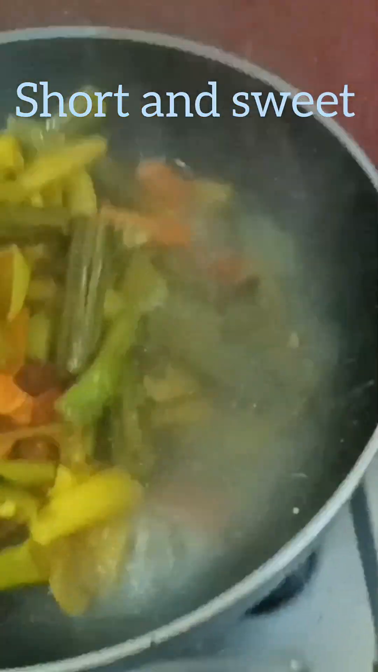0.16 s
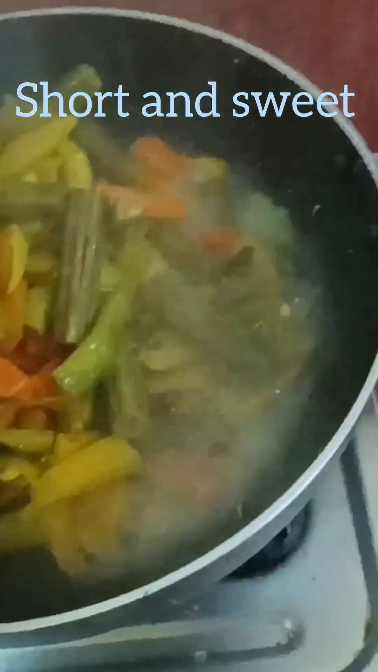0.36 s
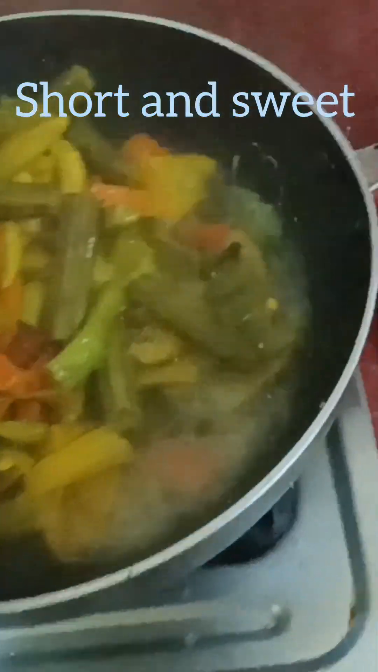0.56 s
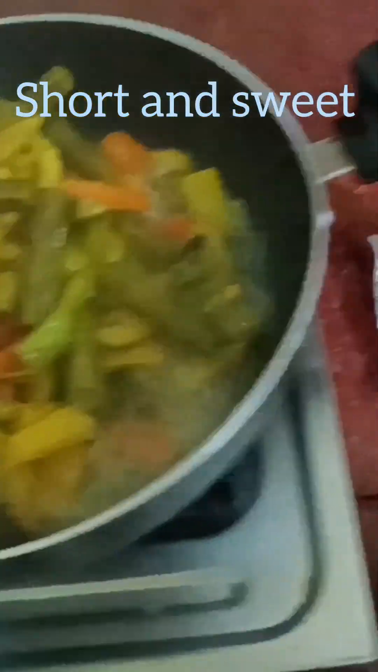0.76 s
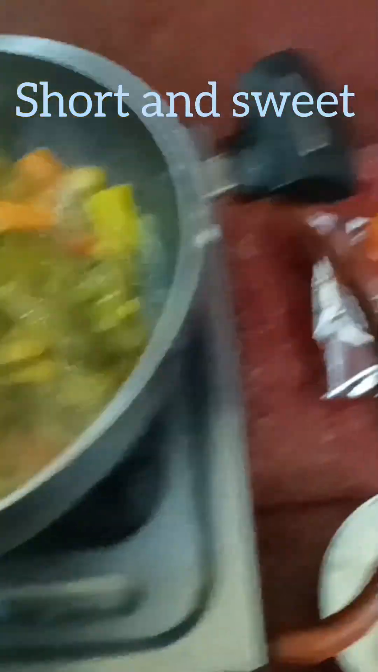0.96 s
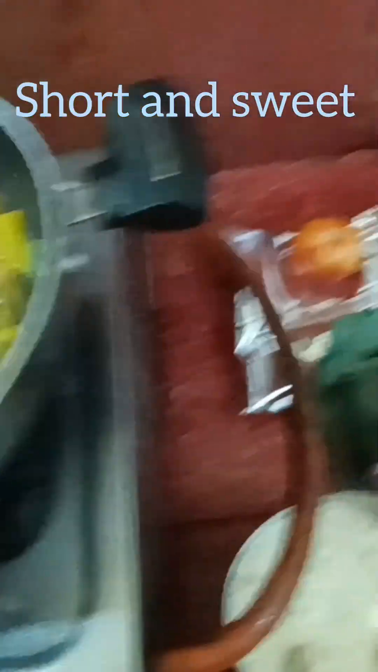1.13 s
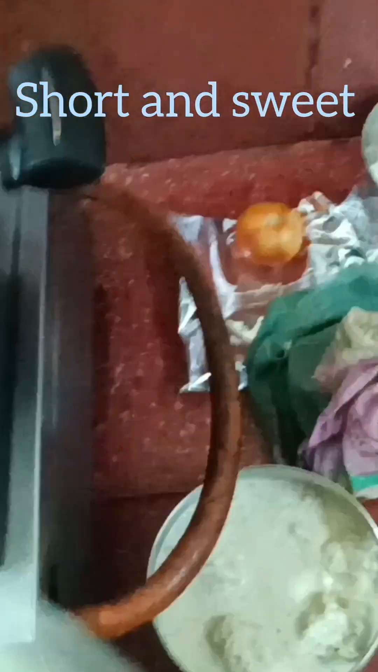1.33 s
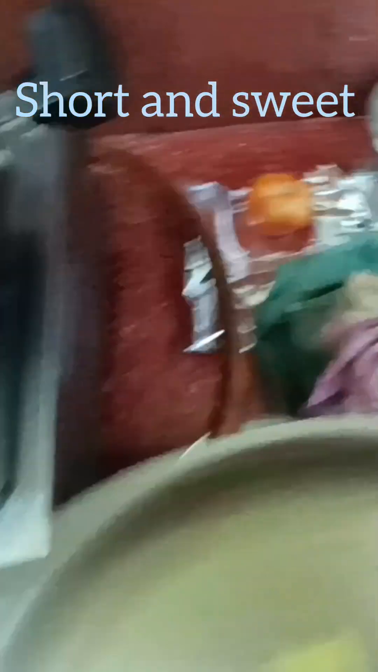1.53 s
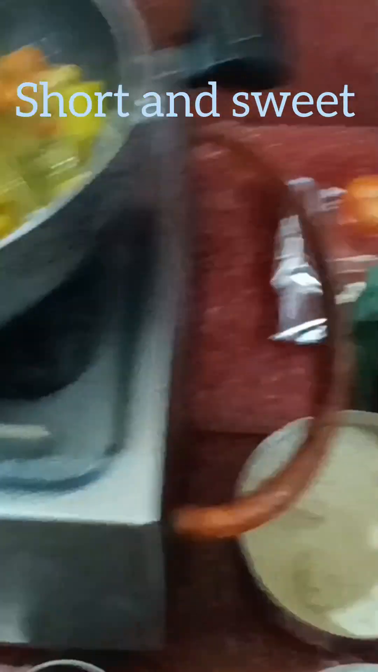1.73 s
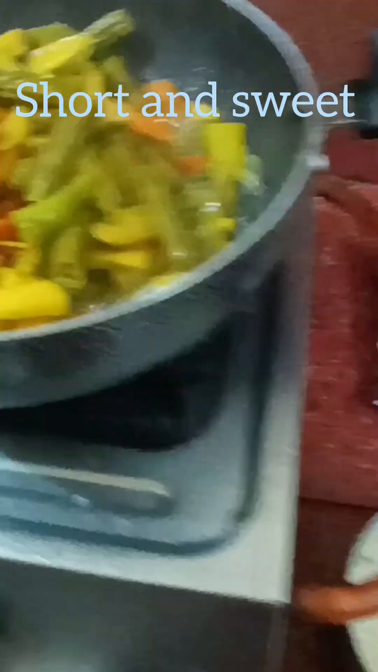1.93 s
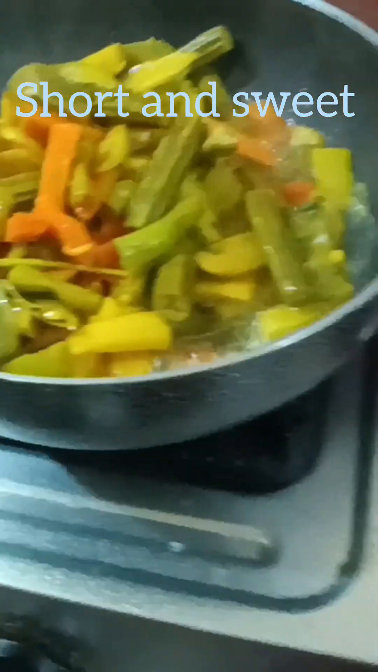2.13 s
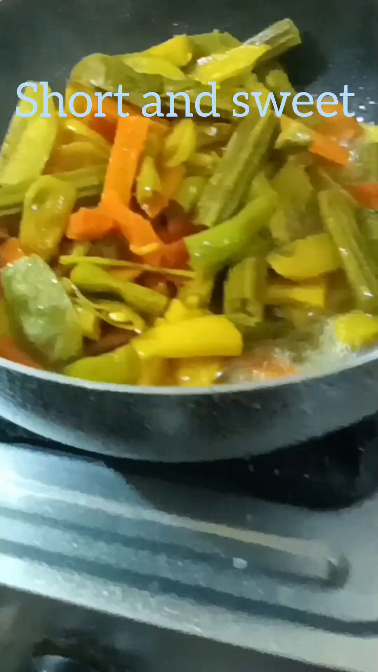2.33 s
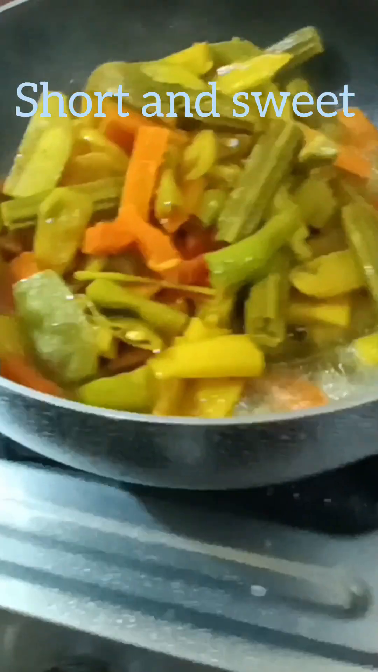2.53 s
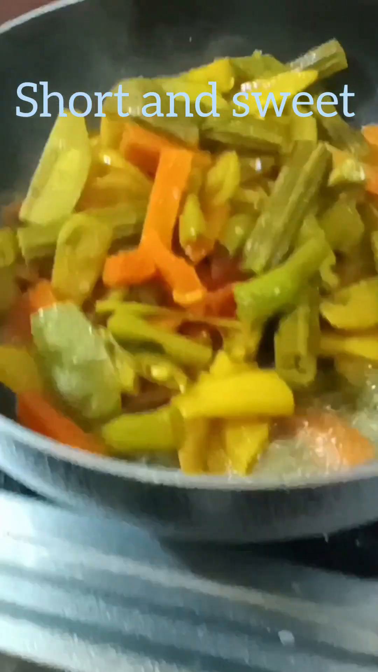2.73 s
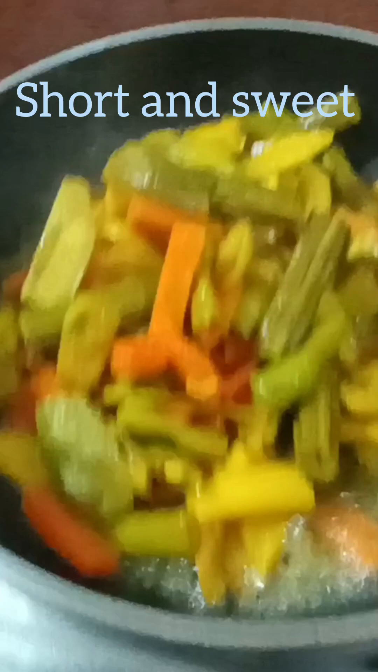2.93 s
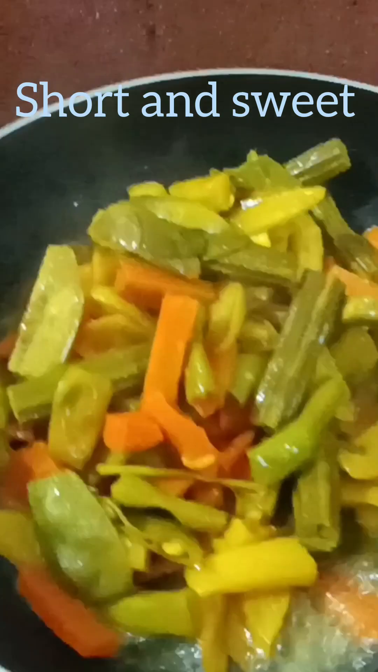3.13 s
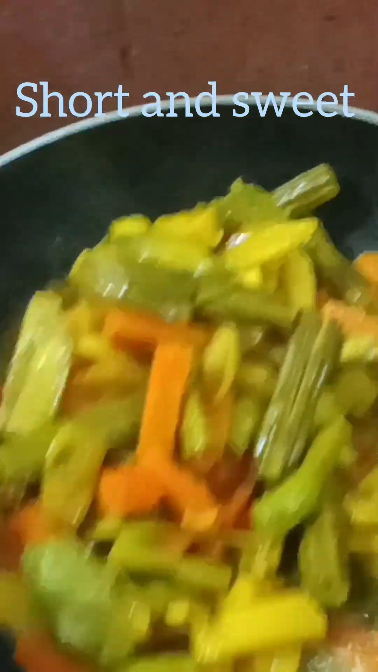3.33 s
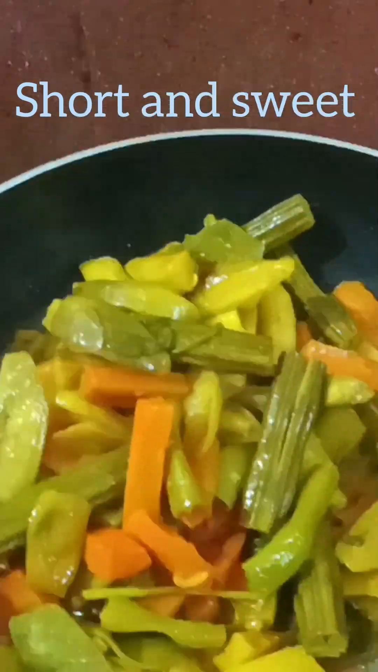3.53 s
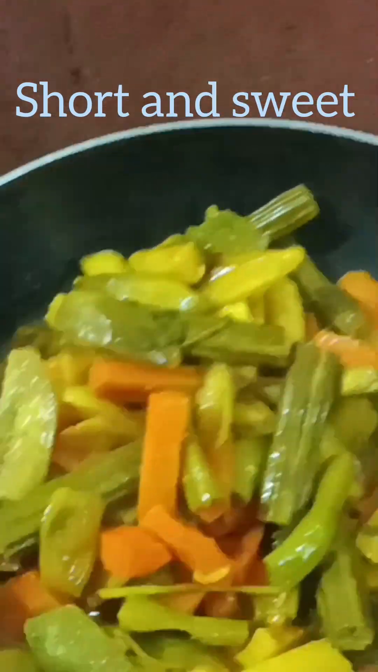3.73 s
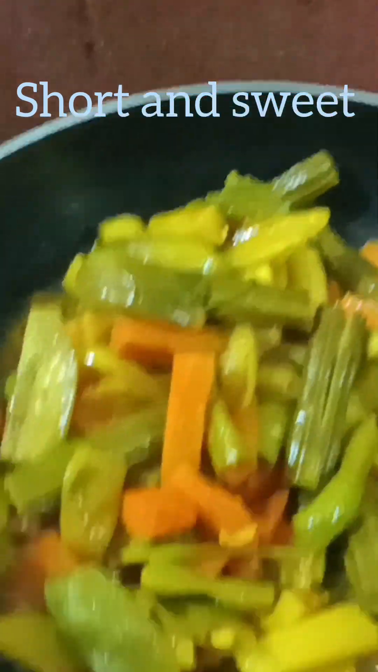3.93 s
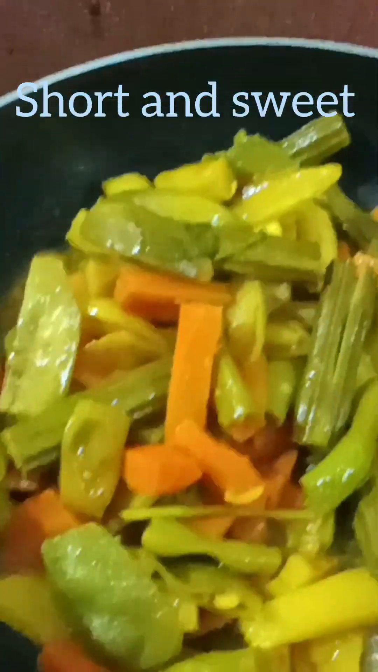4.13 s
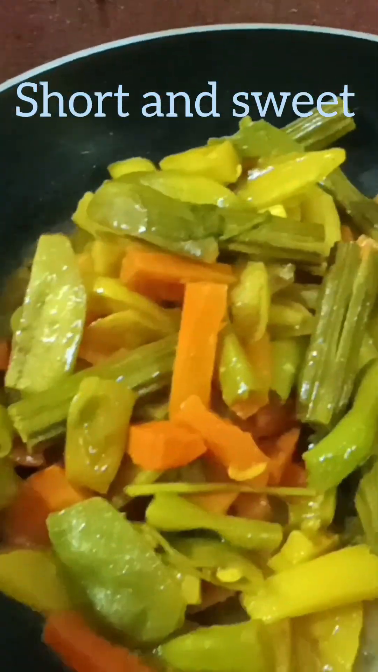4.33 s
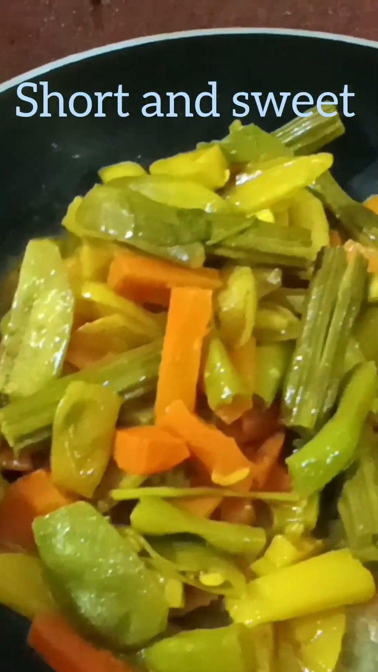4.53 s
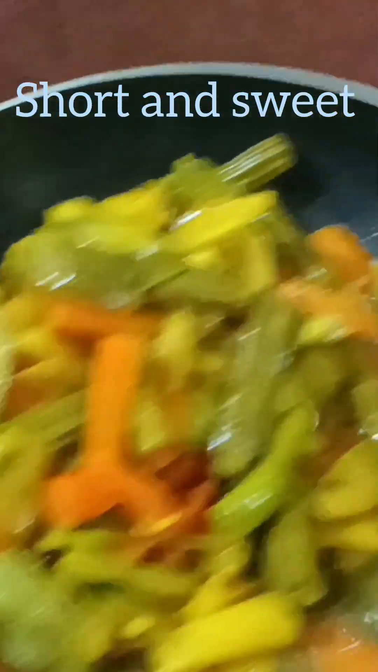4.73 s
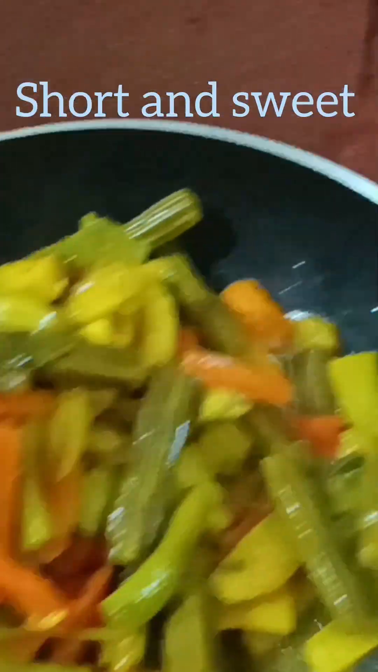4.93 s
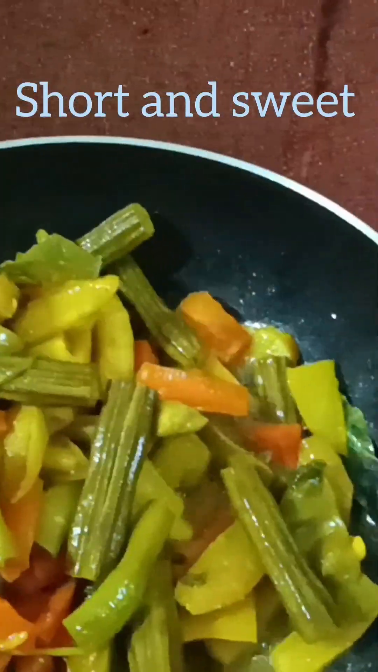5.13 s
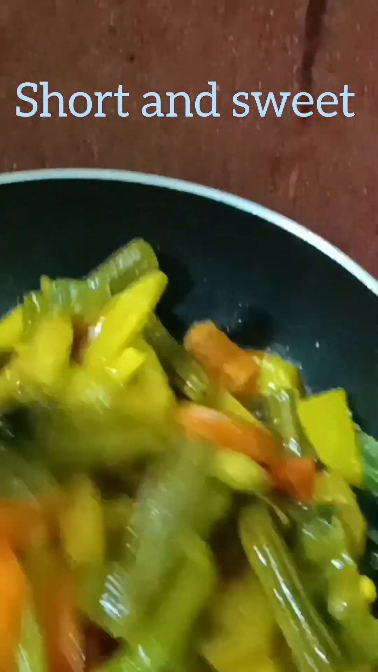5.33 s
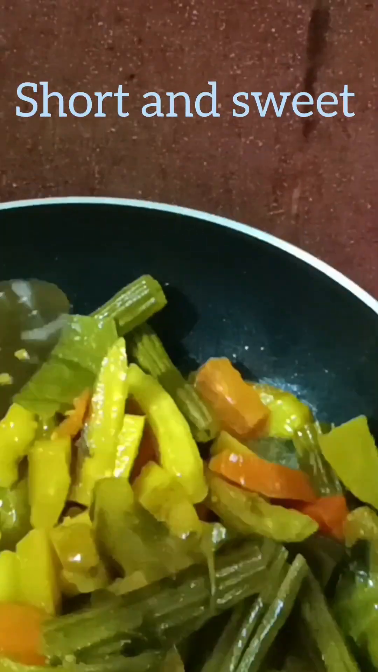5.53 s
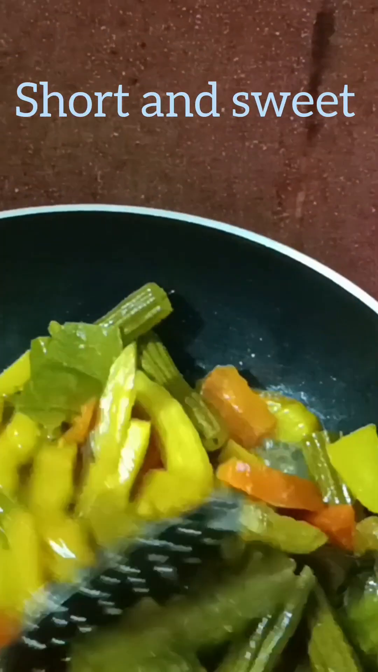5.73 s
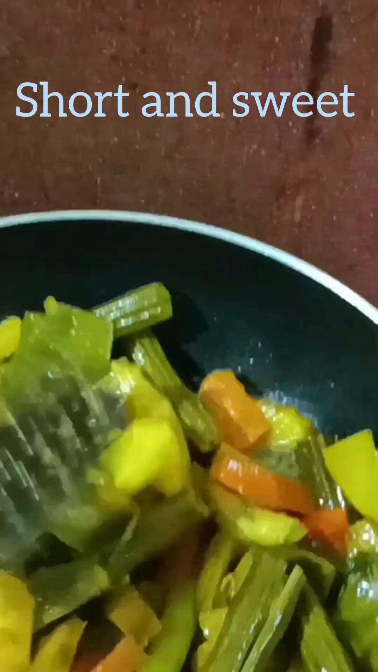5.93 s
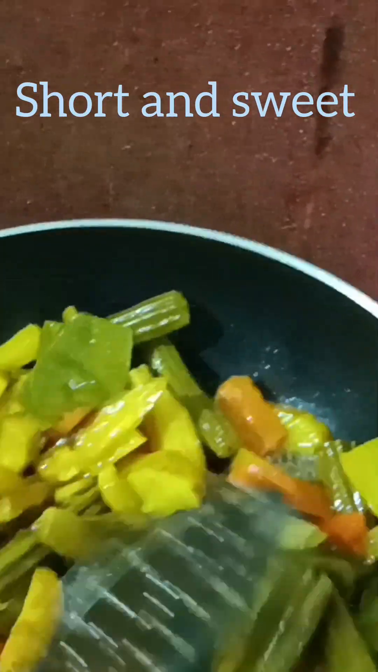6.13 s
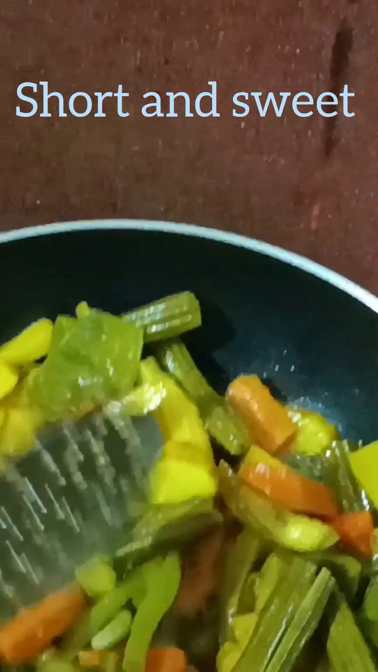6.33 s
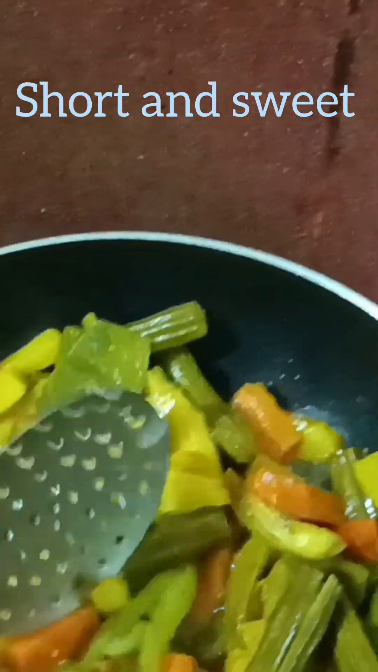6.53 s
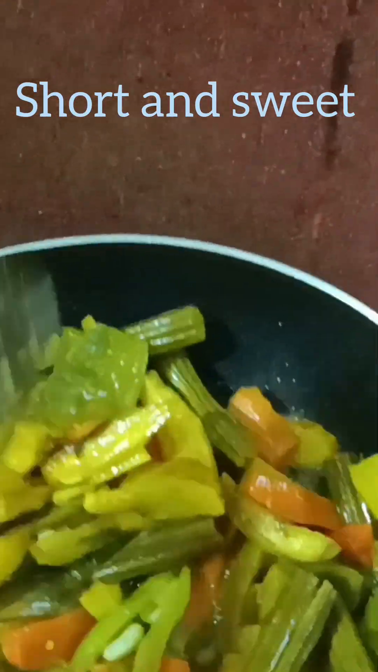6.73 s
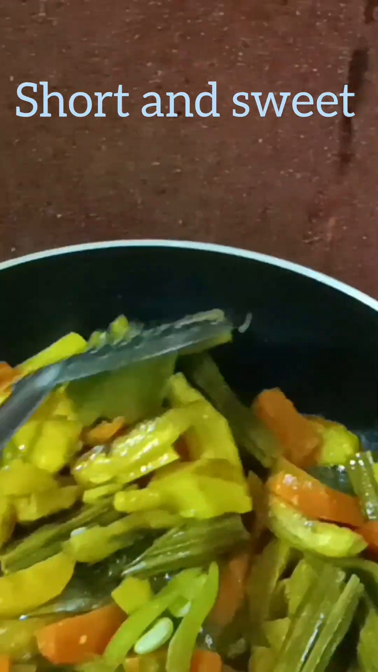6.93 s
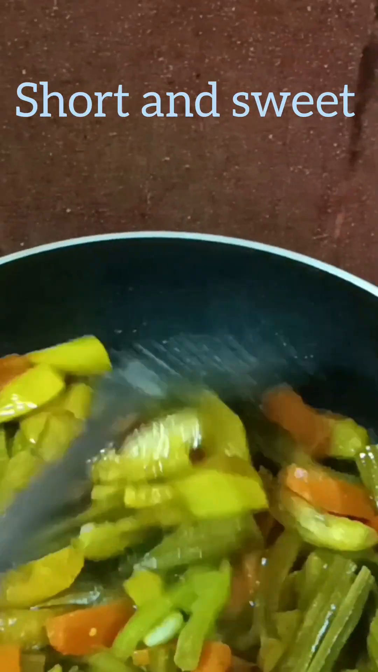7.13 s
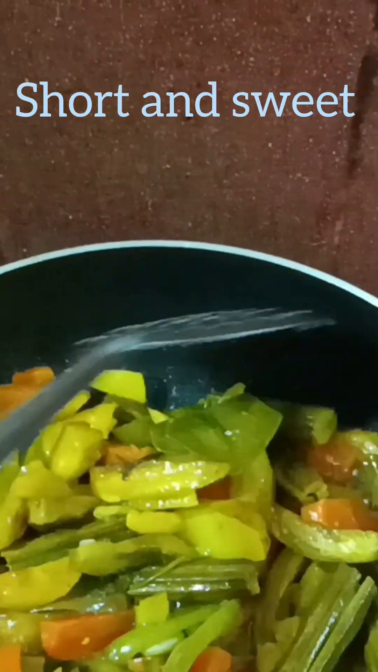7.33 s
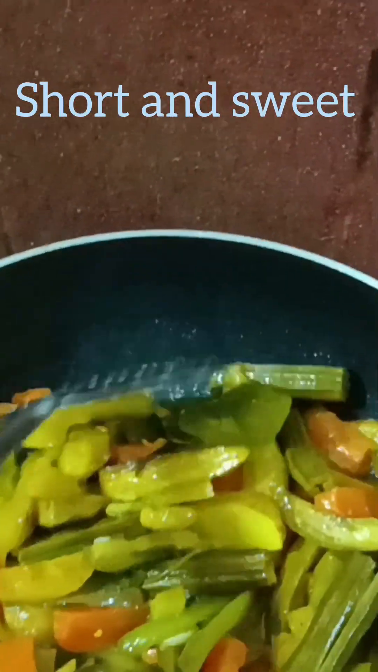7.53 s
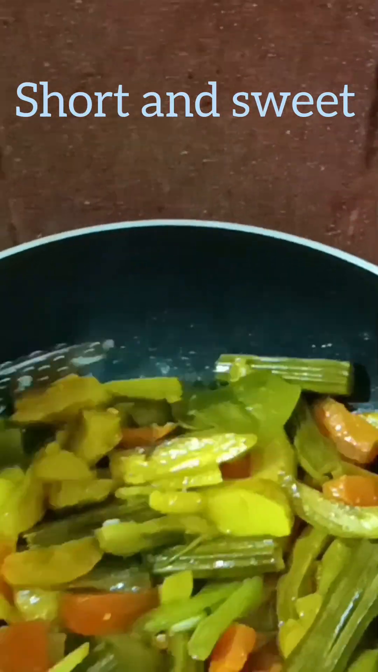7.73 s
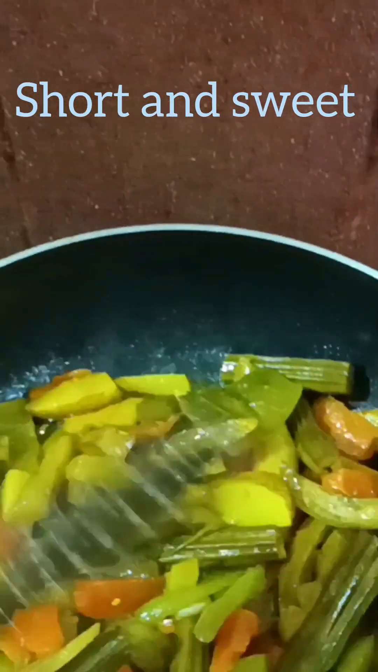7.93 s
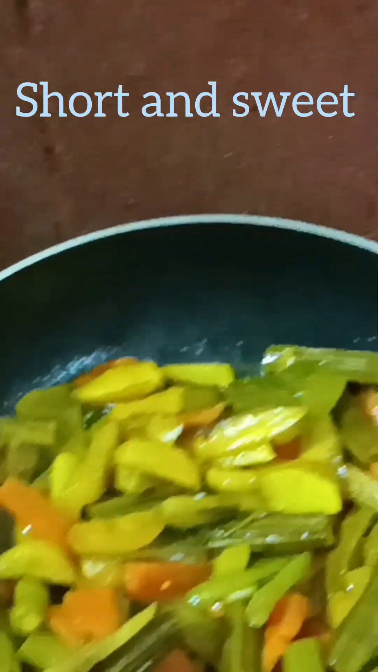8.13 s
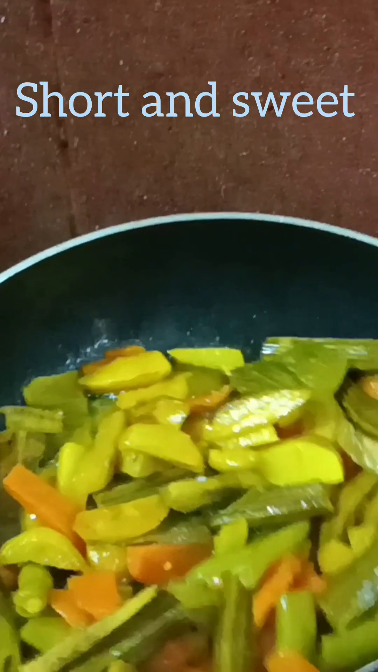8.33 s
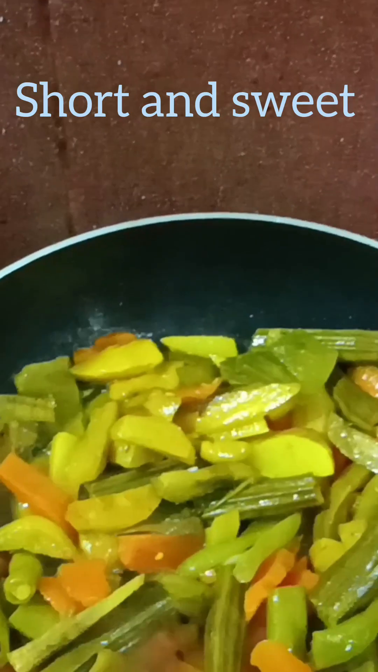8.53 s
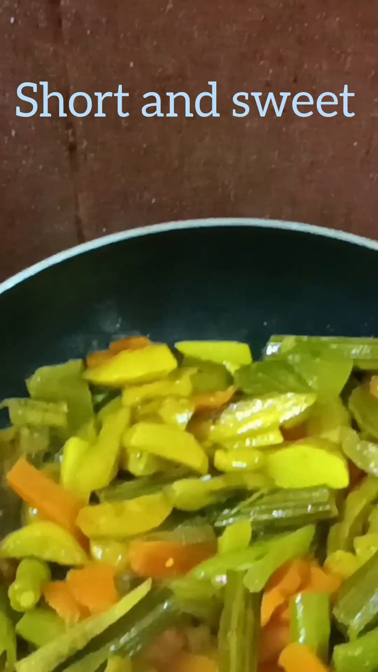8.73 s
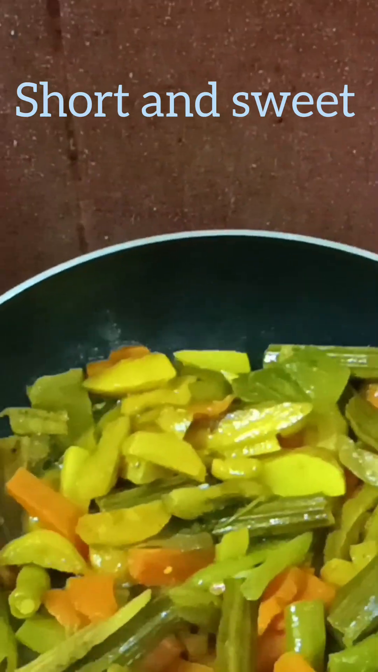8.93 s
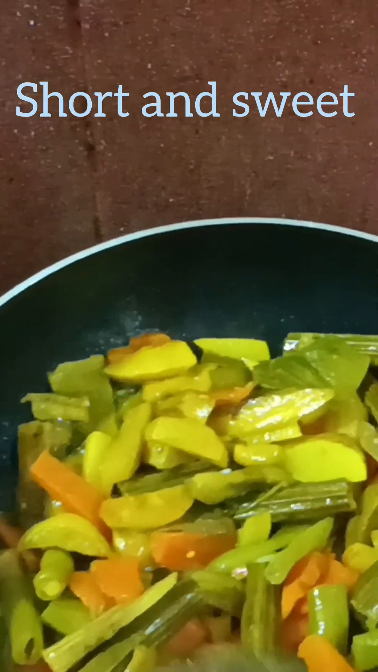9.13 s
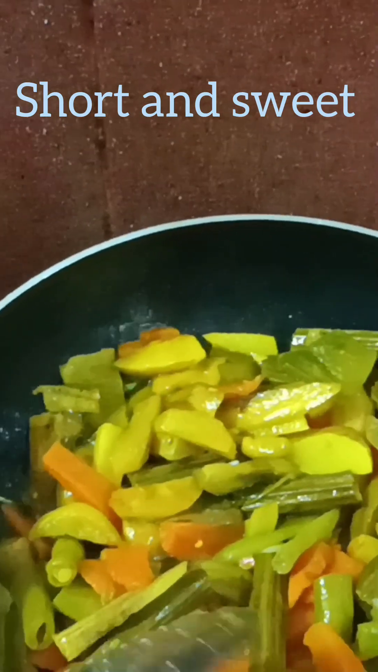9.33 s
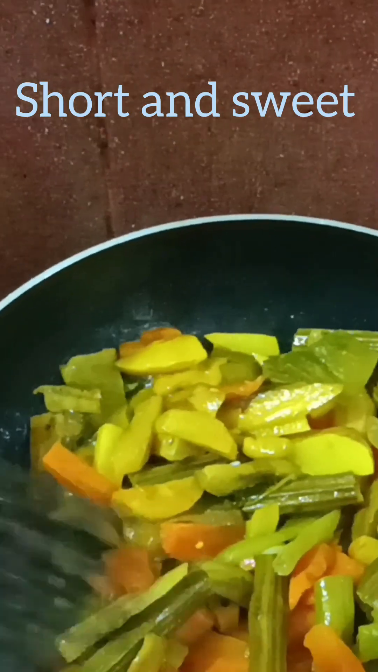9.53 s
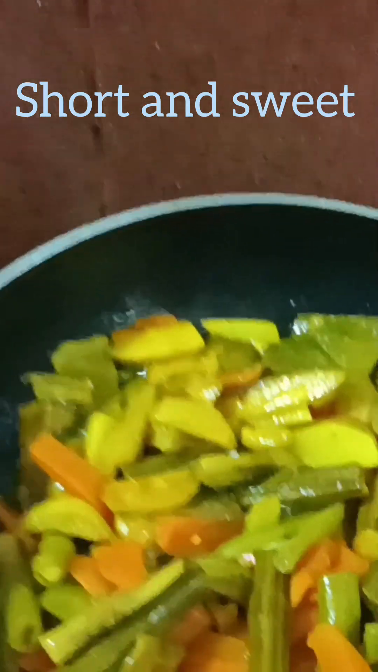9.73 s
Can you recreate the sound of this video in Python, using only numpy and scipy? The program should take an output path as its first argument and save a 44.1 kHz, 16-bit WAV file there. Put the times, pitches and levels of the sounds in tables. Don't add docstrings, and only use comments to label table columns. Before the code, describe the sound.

A handheld phone at arm's length catches a dense, bright sizzle, strongest at the start and steadily fading into separate crackles. An early hiss of steam vanishes after about a second. Light metal clinks, small steam squeaks and low scraping of the pan on its stove come next, then irregular sharp spoon ticks and soft thuds. The stereo is uneven, with bright details stronger on the left.

```python
import sys
import numpy as np
from scipy import signal
from scipy.fft import rfft, irfft, next_fast_len
from scipy.io import wavfile
from scipy.ndimage import uniform_filter1d

SR = 44100
rng = np.random.default_rng(int(sys.argv[2]) if len(sys.argv) > 2 else 0)


def wrap_up_sound(samples):
    columns = np.atleast_2d(samples).T
    tamed = np.clip(columns, -1, 1)
    steps = np.round(tamed * 32767).astype(np.int16)
    wavfile.write(sys.argv[1], SR, steps)


def ratio_of_db(decibels):
    return 10 ** (np.asarray(decibels, float) / 20)


N = 430857
PADDED = next_fast_len(N + 4096)
BINS_HZ = np.arange(PADDED // 2 + 1) * SR / PADDED
LEFT_LAG = 46


def rms_one(x):
    return x / np.sqrt(np.mean(x ** 2) + 1e-20)


def in_time(rows):
    times, *columns = np.transpose(rows)
    return [np.interp(np.arange(N) / SR, times, column) for column in columns]


def colour(x, gain):
    return irfft(rfft(x, PADDED) * gain, PADDED)[..., :N]


def response(points):
    hz, db = np.transpose(points)
    log_gain = np.interp(np.log(BINS_HZ + 1), np.log(hz), db) * np.log(10) / 20
    cepstrum = irfft(log_gain, PADDED)
    cepstrum[1:PADDED // 2] *= 2
    cepstrum[PADDED // 2 + 1:] = 0
    return np.exp(rfft(cepstrum))


def band_filter(x, order, edges_hz, kind):
    return signal.sosfilt(signal.butter(order, edges_hz, kind, fs=SR, output="sos"), x)


def drift(rate):
    r = np.exp(-40 * np.pi * rate / SR)
    slow = signal.lfilter([1], [1, -2 * r, r * r], rng.standard_normal(N // 20 + 3002))[3000:]
    return np.interp(np.arange(N) / 20, np.arange(len(slow)), rms_one(slow))


def ring(x, hz, t60):
    r, w = ratio_of_db(-60 / (t60 * SR)), 2 * np.pi * hz / SR
    return signal.lfilter([0, np.sin(w)], [1, -2 * r * np.cos(w), r * r], x + 1e-18)


def add(out, s, sound):
    i = round(s * SR)
    out[..., i:i + sound.shape[-1]] += sound[..., :N - i]


def bursts(per_s, spread_db, fall_s):
    sizes = ratio_of_db(spread_db * np.minimum(rng.exponential(1, N), 3.5))
    born = rng.random(N) < per_s / SR
    return rms_one(signal.lfilter([1], [1, -np.exp(-1 / (fall_s * SR))], sizes * born))


def whistles(per_s, low_hz, high_hz, cycles):
    sizes = ratio_of_db(3.5 * np.minimum(rng.exponential(1, N), 4)) * rng.choice([-1, 1], N)
    pops = sizes * (rng.random(N) < per_s / SR)
    dealt = rng.integers(0, 14, N)
    pitches_hz = np.geomspace(low_hz, high_hz, 14)
    rings = sum(ring(pops * (dealt == k), hz, cycles / hz) for k, hz in enumerate(pitches_hz))
    return pops, rings


# t/s, level/dB, aim of the phone (3 kHz hump's share of the fizz)/dB
FRYING = [(0, -20.5, -3), (.4, -20.5, -6), (.87, -22, -7), (1.36, -24, -2.5), (1.7, -24, -7),
          (2.1, -25.5, -3.5), (2.45, -26, -3), (2.9, -24.5, -2.5), (3.2, -24.5, -4.5), (3.7, -25, -5),
          (4.3, -26, -3), (5.1, -27, -7), (5.7, -26.5, -7), (6.8, -27.5, -7.5), (7.6, -29, -6.5),
          (8.4, -30, -5.0), (9.1, -30.5, -4.5), (9.77, -31.5, -4)]
# level re vigour/dB, share of vigour's swing [ratio], share of aim [ratio]
FIZZ_BANDS = [
    (-16, 1.16, 0.17),
    (-4.5, 0.95, 1.05),
    (-2.5, 1.06, -0.41),
    (-7, 1.61, -0.18),
]


def band_levels():
    vigour_db, aim_db = in_time(FRYING)
    mean_db = vigour_db.mean()
    vigour_swing, aim_swing = vigour_db - mean_db, aim_db - aim_db.mean()
    return [mean_db + db + swing * vigour_swing + turn * aim_swing for db, swing, turn in FIZZ_BANDS]


# f/Hz, level/dB per Hz
OPEN_PORT = [(500, -32), (900, -17), (1500, -17.5), (2350, -10.5), (2650, -3.5), (3250, 0), (3700, -4),
             (4600, -15), (6500, 1), (9000, -5), (11200, -21), (14100, -28), (14700, -16), (16000, -16)]
# f/Hz, level/dB per Hz
SHADED_PORT = [(250, -25), (540, -23), (850, -11), (3000, -10), (5000, -8), (6500, -10), (8300, -17),
               (9200, -10), (10900, 1), (11800, -2), (12600, -10), (14100, -20), (14700, -9), (16000, -10)]
BAND_EDGES_HZ = [2200, 4700, 9500]
CRACKLE_SHARE_DB = [-17, -12, -4, -3]


def sizzle():
    settled = np.interp(np.arange(N) / SR, [0, 1.5, 9], [.15, .45, 1.2])
    spits = settled * bursts(69, spread_db=-8.0, fall_s=0.0049)
    crackle = settled * bursts(150, spread_db=2.0, fall_s=0.00019)
    burst_power = crackle ** 2 + .6 * spits ** 2
    pings = ratio_of_db(-14) * rms_one(whistles(400, 2100, 8500, cycles=80)[1]) * [[1], [0]]
    ports = np.array([response(OPEN_PORT), ratio_of_db(-8.5) * response(SHADED_PORT)])
    below = [0] + [1 / (1 + (BINS_HZ / edge) ** 8) for edge in BAND_EDGES_HZ] + [1]
    white, together = rng.standard_normal((2, N)), drift(18.0)
    out = 0
    for low, high, level_db, crackle_db in zip(below, below[1:], band_levels(), CRACKLE_SHARE_DB):
        fizz = ratio_of_db(0.69 * together + 1.0 * drift(17.3) + 0.41 * drift(5.5))
        power = fizz ** 2 + ratio_of_db(2 * crackle_db) * burst_power
        band = colour(white * np.sqrt(power) + pings, ports * (high - low))
        out = out + band / np.std(band.mean(axis=0)) * ratio_of_db(level_db - 1)
    return out


# t/s, level/dB
STEAM = [
    (0, -27),
    (.4, -26),
    (.8, -31),
    (1.1, -37),
    (1.25, -48),
    (9.77, -55),
]


def rush():
    hiss = rms_one(band_filter(rng.standard_normal((2, N)), 4, [3350, 4450], "band"))
    return ratio_of_db(in_time(STEAM)[0] + 6 + drift(15)) * hiss * ratio_of_db([[0], [-20]])


# f/Hz, level/dB, t60/s
PAN_MODES = [(74.5, -21, 0.62), (90, -15, 0.37), (183, -5, 0.11), (262, -15, 0.12), (264, -6, .08),
             (300, 7, 0.2), (350, 8.5, 0.97), (408, 8.5, .12), (441, 11, 0.91), (522, 17.5, 0.088),
             (595, 10, 0.23), (678, -12, 0.072), (790, -12, 0.14), (755, -15, 0.15), (956, -2, 0.051),
             (1061, 4.5, 0.086), (1270, 9.5, 0.093), (1397, 21.5, 0.82), (1389, -18, 0.44), (1480, 6, .1),
             (1600, 34, 0.019), (1780, 36, 0.076), (2090, -16, .12)]


def bubbles():
    pops, rings = whistles(200, 702.6, 2390, cycles=45.0)
    pan = sum(ratio_of_db(db) * ring(pops, hz, t60) for hz, db, t60 in PAN_MODES if hz > 700)
    sound = ratio_of_db(band_levels()[0]) * (ratio_of_db(-6) * rms_one(rings) + ratio_of_db(-8) * rms_one(pan))
    return np.array([np.roll(sound, LEFT_LAG), ratio_of_db(-5.5) * sound])


# f/Hz, level/dB per Hz
RUMBLE_TONE = [(25, -9), (75, 8), (130, 0), (300, -2.5), (500, -4), (900, -42.5)]
# t/s, length/s, level/dB
STOVE_SHUDDERS = [
    (2.5, 0.24, -59),
    (3.15, 1, -56.5),
    (5.1, .3, -63),
    (6.5, 2.28, -64),
    (9.1, 0.26, -57),
]


def rumble():
    t, edge_s = np.arange(N) / SR, 0.08
    floor_db, boil_db = -74, -39 - 13.5 * t
    power = ratio_of_db(2 * floor_db) + ratio_of_db(2 * boil_db)
    for s, length, db in STOVE_SHUDDERS:
        inside_s = np.minimum(t - s + edge_s, s + length + edge_s - t)
        power = power + ratio_of_db(2 * db) * np.clip(inside_s / edge_s, 0, 1) ** 2
    mid, side = colour(rng.standard_normal((2, N)), response(RUMBLE_TONE))
    ports = rms_one(np.array([mid + 0.74 * side, mid - 0.7 * side]))
    return np.sqrt(power) * ratio_of_db(2.0 * drift(7) - 2) * ports


# t/s, height [signed amplitude], left share [0-1], rise/s, fall/s
PORT_THUMPS = [
    (0.013, 0.14, 0.94, 0.0024, 0.0072),
    (0.101, 0.15, 1, .002, 0.0057),
    (0.393, -1.1, 0.04, 0.0021, 0.0018),
    (3.154, -0.77, 1, 0.00074, 0.0034),
    (5.4013, 0.9, 0, 0.00012, 0.0018),
    (5.451, -0.91, 0, 0.00043, 0.0028),
    (5.858, 0.1, 1, 0.0013, 0.0052),
    (6.031, .015, 0, 0.0011, 0.0035),
    (7.495, 0.14, 1, 0.00054, 0.0038),
]


def thumps():
    out, t = np.zeros((2, N)), np.arange(SR // 10) / SR
    for s, height, left, rise, fall in PORT_THUMPS:
        pulse = (1 - np.exp(-t / rise)) ** 2 * np.exp(-t / fall)
        add(out, s, 1.9 * height * pulse * [[left], [1 - left]])
    out = band_filter(out + 1e-18, 2, 1100, "low")
    out = band_filter(out + 1e-18, 1, 18, "high")
    return signal.sosfiltfilt(signal.butter(1, 25, "high", fs=SR, output="sos"), out)


# t/s, length/s,
# level/dB rms, centre f/Hz
CLINKS_AND_HUM = [(0.541, 0.26, -45, 790), (7.206, 0.042, -42, 678), (1.939, 0.03, -28, 1480),
                  (1.987, .09, -34.5, 982), (1.991, .026, -24.5, 1600), (2.048, .07, -39, 718),
                  (2.137, .05, -40, 1310), (2.402, 0.92, -62, 75.4), (2.449, 0.01, -27, 1370),
                  (2.468, 0.076, -34.5, 1240), (2.566, .018, -33, 1480), (2.638, .059, -42, 1270),
                  (3.218, .05, -29.5, 595), (3.722, 0.042, -43, 950), (3.98, 0.031, -36.5, 1389),
                  (3.07, .06, -40.5, 1270), (7.938, .045, -45, 678), (5.135, 0.038, -42.5, 1070),
                  (5.612, 0.027, -42, 2090), (6.137, .024, -38, 1427), (6.261, .03, -38.5, 2090),
                  (7.201, .013, -36, 1330), (7.932, 0.078, -32, 1389), (7.949, 0.057, -38, 441),
                  (8.954, 0.011, -34, 1720), (9.088, .037, -44, 2040), (9.201, .046, -43, 2090),
                  (9.211, 0.041, -30, 1162), (9.222, 0.055, -33, 1389), (9.409, .016, -41.5, 1264)]
# t/s, length/s, level/dB rms, centre f/Hz
STEAM_SQUEAKS = [
    (2.14, .03, -29, 2500),
    (2.79, .04, -27, 2650),
    (4.28, .03, -28, 3750),
    (4.474, .02, -25.5, 5250),
    (5.0, .03, -31, 2900),
    (6.49, .03, -29, 3100),
    (7.502, .04, -28.5, 5760),
    (6.83, .02, -31, 5870),
]
# t/s, length/s, level/dB rms, centre f/Hz
PAN_DRAGS = [(2.548, 0.14, -47, 268), (3.175, 0.088, -25, 300), (3.28, .05, -41, 310),
             (3.456, 0.09, -37.5, 266), (3.692, 0.14, -32, 295), (3.828, 0.056, -40, 270),
             (3.92, .077, -31, 320), (4.006, .05, -36.5, 336), (4.064, 0.051, -28.5, 317),
             (4.145, .032, -34.5, 315), (4.201, 0.077, -39, 294), (5.133, 0.059, -35, 284),
             (7.201, .088, -43, 260), (7.934, .19, -41, 348)]
# multiple of centre [ratio], level/dB, spread/octaves
DRAG_PARTIALS = [
    (1.0, -1.5, 0.19),
    (1.45, -13, 0.18),
    (2.0, -15.5, .12),
]
# t/s, length/s, level/dB rms, hardness/dB
SPOON_THUDS = [
    (2.454, 0.081, -42, -7),
    (5.611, 0.05, -43.5, 11.5),
    (7.489, 0.1, -32.5, -6.5),
    (8.349, 0.15, -51, 0),
    (8.581, .1, -45, -4),
    (9.028, 0.091, -30.5, -5),
    (9.208, 0.094, -35.5, -6),
]
# centre f/Hz, level/dB, spread/octaves, length factor [ratio], share of hardness [ratio]
THUD_PARTIALS = [
    (290, -2.5, 0.68, 1.0, 0),
    (441, -3.5, .05, 1.16, 0.035),
    (560, -6, .3, 0.56, 0),
    (112, -19.5, 0.47, 1.8, 0),
    (1060, -1.5, 0.17, 0.71, 1),
    (800, 1.5, 0.78, 0.3, 0.9),
]


def contacts():
    small = [(*row, 0.078) for row in CLINKS_AND_HUM + STEAM_SQUEAKS]
    drags = [(s, length, db + part_db, hz * multiple, spread)
             for s, length, db, hz in PAN_DRAGS
             for multiple, part_db, spread in DRAG_PARTIALS]
    thuds = [(s, length * longer, db + part_db + share * hard_db, hz, spread)
             for s, length, db, hard_db in SPOON_THUDS
             for hz, part_db, spread, longer, share in THUD_PARTIALS]
    return small + drags + thuds


def knocks():
    out, events = np.zeros((2, N)), contacts()
    grit = rng.standard_normal((len(events), SR))
    lean_db = rng.normal(0, 1, len(PAN_MODES))
    for rough, (s, length, level_db, centre_hz, spread) in zip(grit, events):
        t = np.arange(round((min(length, .8) + .15) * SR)) / SR
        rough = rough[:len(t)]
        blow = 2.0 * np.exp(-t * centre_hz * 4) * np.abs(rough)
        edges = centre_hz * 2 ** (np.array([-1, 1]) * (0.046 + 1.15 * spread))
        rub = band_filter((rough + blow) * (t < length) + 1e-18, 2, edges, "band")
        sound = np.ones((2, 1)) * (2.5 + 12.0 * spread ** 3) * rub
        for (hz, db, t60), lean in zip(PAN_MODES, lean_db):
            near = np.exp(-.5 * (np.log2(hz / centre_hz) / spread) ** 2)
            if near > 1 / 50:
                mode = ring(rub, hz, t60) / np.sqrt(t60)
                sound += near * ratio_of_db(db) * mode * ratio_of_db([[lean], [-lean]])
        swell = np.sqrt(uniform_filter1d(np.sum(sound ** 2, axis=0), size=600) + 1e-9)
        sound = sound / swell ** .6
        damping = np.exp(-np.maximum(t - length, 0) / 0.021)
        easing = ratio_of_db(-5 * t / length) * damping
        add(out, s, ratio_of_db(level_db + 3.5) * easing * sound / np.std(sound[:, :round(length * SR)]))
    shaded = signal.lfilter(*signal.butter(1, 1510, fs=SR), out[1])
    return np.array([np.roll(out[0], LEFT_LAG), shaded])


# t/s, peak level/dB, high ring f/Hz, low ring level re peak/dB, top rings level re peak/dB
SPOON_TICKS = [(5.4393, -8, 6600, -29, -30), (5.6125, -32, 6160, -4, -8), (6.4368, -13, 7040, -28, -25),
               (6.698, -14, 5970, -28, -24), (6.7104, -14, 5870, -26, -19), (6.8229, -18, 5870, -16, -18),
               (7.2063, -12, 6550, -28, -15), (7.3674, -21, 6370, -14, -23), (7.493, -9.5, 8440, -27, -10),
               (7.5, -10, 5770, -22, -8), (7.893, -19, 6450, -12, -12), (7.9274, -9.5, 6530, -7, -6),
               (8.026, -8.5, 6130, -7, -33), (8.318, -10.5, 6010, -9, -11), (8.3836, -12, 6200, 0, -25),
               (8.538, -16.5, 6940, -2, -21), (8.5728, -13.5, 6120, -27, -9), (8.956, -21, 6900, -22, -16),
               (9.639, -21, 6650, 10, -38)]
SIDE_MODES = [.93, 1.12, 1.27]
TOP_MODES_HZ = [9500, 11250]


def ticks():
    out, t = np.zeros((2, N)), np.arange(SR // 8) / SR
    chatters = rng.standard_normal((len(SPOON_TICKS), 3, SR // 8))
    for chatter, (s, peak_db, high_hz, low_db, top_db) in zip(chatters, SPOON_TICKS):
        touch = (chatter[0] + 2.0 * (t == 0)) * np.exp(-t / 0.003)
        rings = ring(touch, high_hz, 0.068) + ratio_of_db(low_db + 5) * ring(touch, 3235, 0.049)
        rings = rings + 0.64 * sum(ring(touch, ratio * high_hz, 0.013) for ratio in SIDE_MODES)
        top = sum(ring(touch, hz, 0.053) for hz in TOP_MODES_HZ) + 1.5 * np.diff(touch, prepend=0)
        crack = band_filter(chatter[1:], 2, [2500, 10000], "band") * np.exp(-t / 0.0024)
        sound = rings / np.abs(rings).max() * ratio_of_db([[0], [-14]])
        sound = sound + ratio_of_db(top_db + np.array([[-1], [-9]])) * top / np.abs(top).max()
        add(out, s, ratio_of_db(peak_db + 1.0) * (sound + ratio_of_db([[-9], [-16]]) * crack))
    return band_filter(out + 1e-18, 4, 2000, "high")


def scene():
    return sizzle() + rush() + bubbles() + rumble() + thumps() + knocks() + ticks()


def roll_off(x):
    return signal.sosfilt(signal.butter(12, 17100, fs=SR, output="sos"), x)


def record(dry):
    bass = signal.sosfiltfilt(signal.butter(1, 500, fs=SR, output="sos"), dry)
    over_db = np.maximum(20 * np.log10(np.abs(bass).max(axis=0) + 1e-9) + 9, 0)
    slope = 60 * np.arange(N) / SR
    held_db = np.maximum.accumulate(over_db + slope) - slope
    duck_db = uniform_filter1d(np.roll(held_db, -500), size=400)
    ducked = bass + (dry - bass) * ratio_of_db(-1.1 * duck_db)
    limited = np.clip(ducked, [[-.6], [-.86]], [[.6], [.86]])
    cut = signal.sosfilt(signal.ellip(10, .5, 80, 15850, fs=SR, output="sos"), limited)
    return roll_off(cut)


dry = scene()
out = record(dry)
wrap_up_sound(out)
```